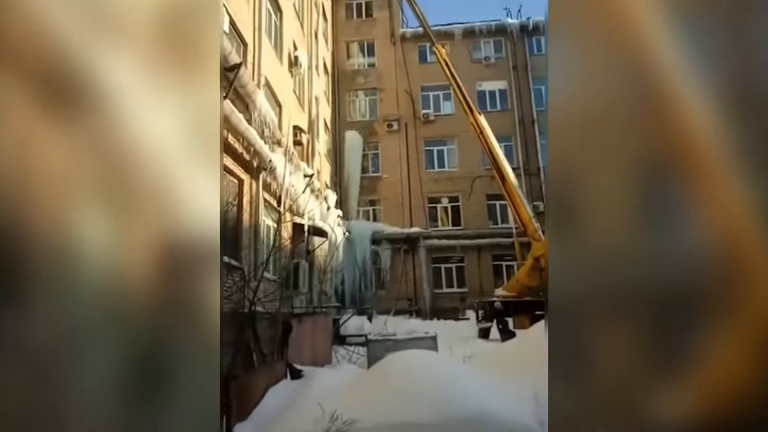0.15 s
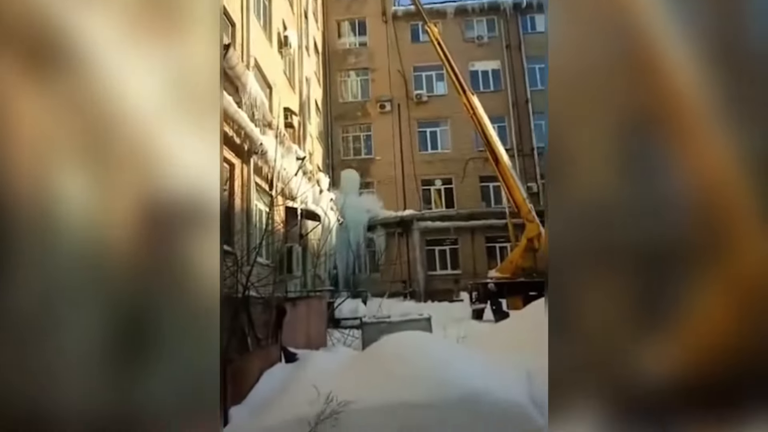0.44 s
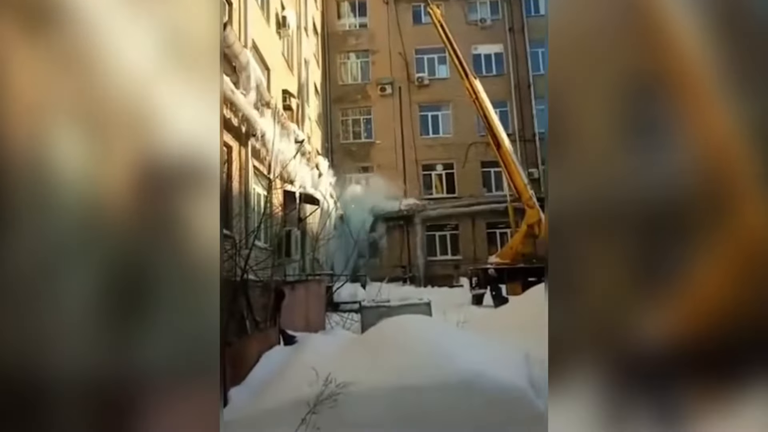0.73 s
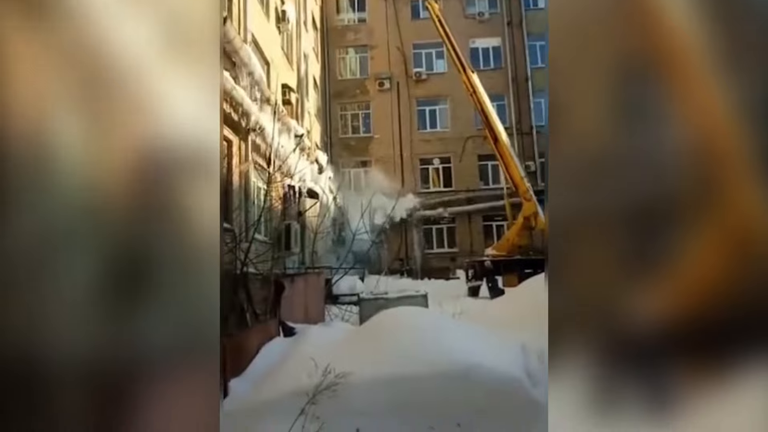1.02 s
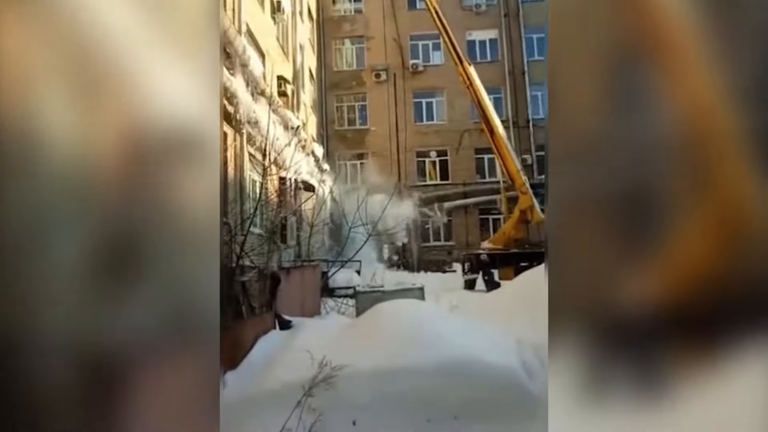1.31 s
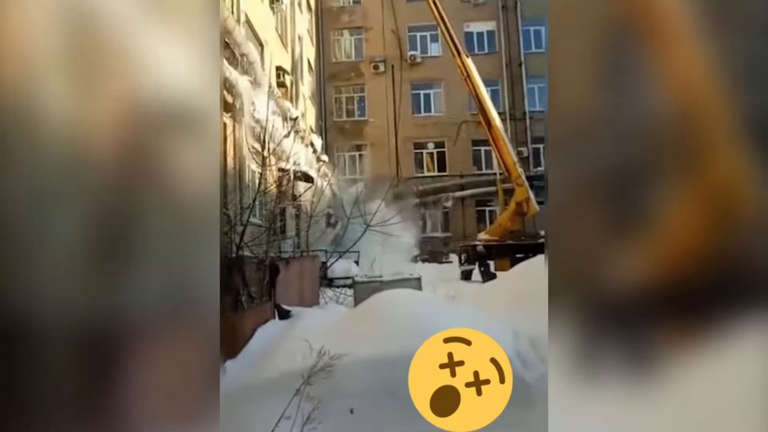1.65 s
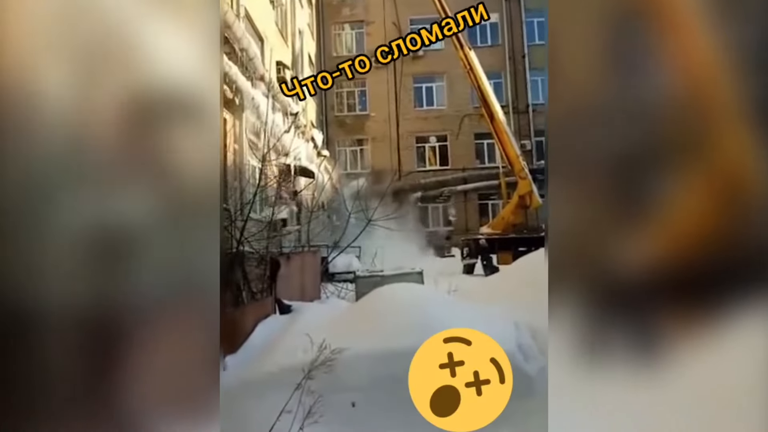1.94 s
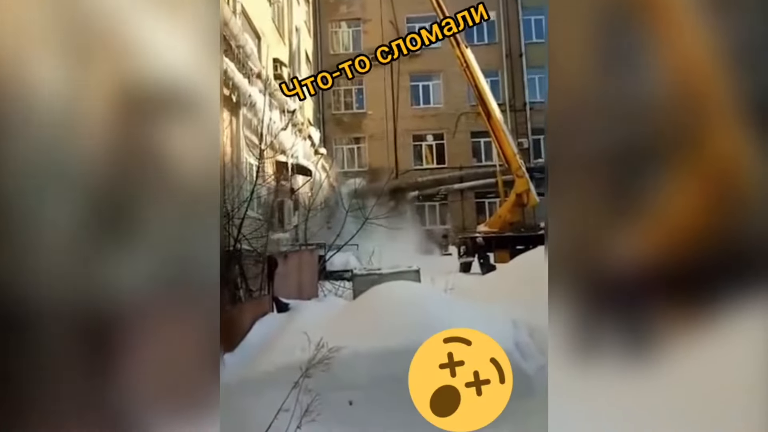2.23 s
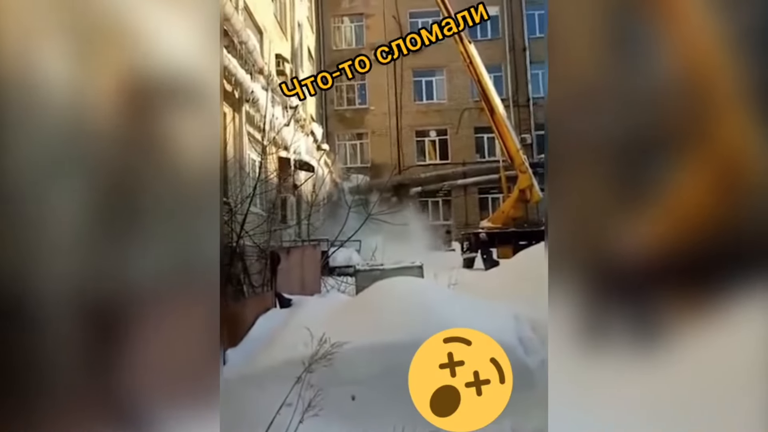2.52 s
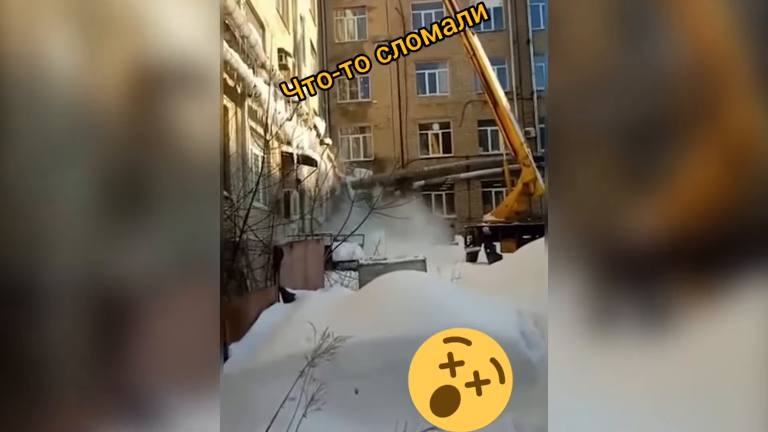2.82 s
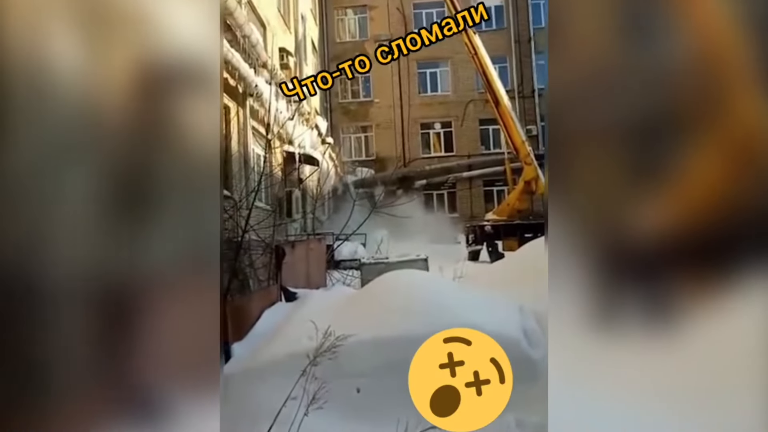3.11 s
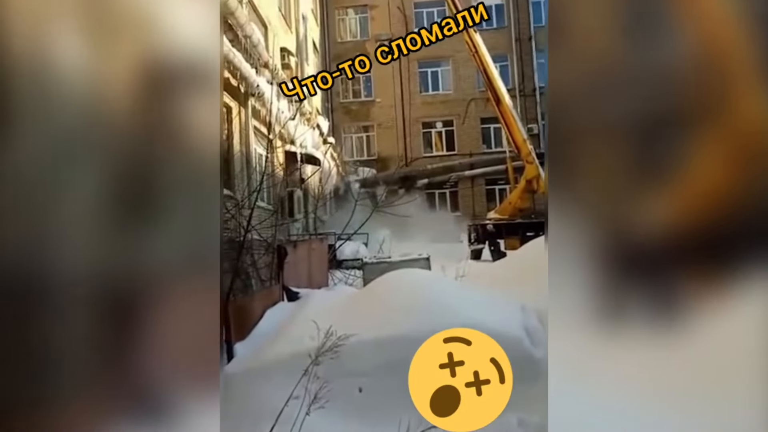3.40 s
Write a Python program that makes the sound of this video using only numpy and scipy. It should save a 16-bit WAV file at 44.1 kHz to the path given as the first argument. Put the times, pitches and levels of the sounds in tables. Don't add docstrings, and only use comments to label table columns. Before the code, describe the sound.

A huge ice mass crashes down almost at once, heavy slabs booming, blocks thudding, pieces cracking and shattering over pattering shards, then fading in an echoing courtyard, heard from afar through a phone microphone.

```python
import sys
import numpy as np
from scipy import signal
from scipy.fft import rfft, irfft
from scipy.io import wavfile
from scipy.ndimage import uniform_filter1d

SR = 44100
rng = np.random.default_rng(int(sys.argv[2]) if len(sys.argv) > 2 else 0)


def nominal_scale(level):
    x = np.asarray(level, float) / 20
    return 10 ** x


def wrap_up_sound(samples):
    columns = np.atleast_2d(samples).T
    tamed = np.clip(columns, -1, 1)
    steps = np.round(tamed * 32767).astype(np.int16)
    wavfile.write(sys.argv[1], SR, steps)


N = 156555


def rms_one(x):
    return x / np.sqrt(np.mean(x ** 2) + 1e-20)


def in_time(rows, lag=0.):
    s, db = np.transpose(rows)
    t = np.arange(N) / SR - lag
    return nominal_scale(np.interp(t, s, db)) * (t > s[0])


def colour(x, *tables):
    hz = np.log(np.maximum(np.arange(4097) * SR / 8192, 1))
    db = 0
    for table in tables:
        points = np.array(table)
        db = db + np.interp(hz, np.log(points[:, 0]), points[:, 1])
    cepstrum = irfft(np.log(nominal_scale(db)))
    cepstrum[1:4096] *= 2
    cepstrum[4097:] = 0
    response = irfft(np.exp(rfft(cepstrum)))
    return signal.fftconvolve(x, response)[:len(x)]


def drift(rate):
    r = np.exp(-80 * np.pi * rate / SR)
    slow = signal.lfilter([1], [1, -2 * r, r * r], rng.standard_normal(N // 40 + 2002))[2000:]
    return np.interp(np.arange(N) / 40, np.arange(len(slow)), rms_one(slow))


def knocks(rate, spread_db, clump_db, clump_rate):
    sizes = nominal_scale(spread_db * np.minimum(rng.exponential(1, N), 5)) * rng.choice([-1, 1], N)
    hits = rng.random(N) < rate / SR
    return rms_one(sizes * hits * nominal_scale(clump_db * drift(clump_rate)))


def yard(x, wet_db, t60_share):
    t60_s, delay_s, hop = 1, 0.031, 6000
    t = np.arange(SR) / SR
    decay = nominal_scale(-60 * t / (t60_s * t60_share)) * np.clip(t / delay_s - .5, 0, 1)
    decay *= nominal_scale(wet_db) / np.sqrt(np.sum(decay ** 2))
    fade = np.sin(np.pi * np.arange(2 * hop) / (2 * hop))
    padded = np.pad(x, (hop, 2 * hop))
    wet = np.zeros(N + 2 * SR)
    for i in range(0, N + hop, hop):
        piece = signal.fftconvolve(padded[i:i + 2 * hop] * fade, rng.standard_normal(SR) * decay)
        wet[i:i + len(piece)] += piece
    return (x + wet[hop:hop + N]) / np.sqrt(1 + nominal_scale(2 * wet_db))


# frequency in Hz, level in dB.
PORT_TONE = [(1050, 0), (1200, -5), (1500, 0), (1750, 3), (2000, -2.5), (2200, -6), (2800, -8.5),
             (3300, -5.5)]


def heard(contacts, spectrum, wet_db, t60_share):
    return rms_one(yard(colour(contacts, spectrum, PORT_TONE), wet_db, t60_share))


# frequency in Hz, level in dB.
IDLE_TONE = [(100, -2), (450, -15.5), (540, -14.5), (1080, -20.5), (1250, -30), (2100, -34.5), (2500, -39),
             (6000, -50.5)]


def idle():
    murmur = rms_one(colour(rng.standard_normal(N), IDLE_TONE, PORT_TONE))
    return nominal_scale(-36.5 + 0.39 * drift(25.0)) * murmur


# time in seconds, level in dB.
SHARD_FLOW = [(.06, -76), (.154, -68), (.164, -40), (.19, -41), (.2, -31.5), (.25, -32), (.36, -32.5),
              (.55, -34.5), (.92, -31), (1.45, -31), (1.7, -29), (2.0, -29), (2.2, -29.5), (2.4, -31),
              (2.55, -30), (2.9, -34.5), (3.22, -39), (3.55, -39)]
# frequency in Hz, level in dB.
SHARD_TONE = [(300, -14), (800, 1), (1500, -5), (3000, -0.5), (5000, -12.5), (7000, -6), (16000, -6)]


def shards():
    patter = heard(knocks(6000, 4.5, 0.95, 5.2), SHARD_TONE, 1.6, 0.9)
    return nominal_scale(7) * in_time(SHARD_FLOW) * patter


# start in seconds, peak level in dB, length in seconds, ring in Hz.
SHATTERS = [(0.163, -28, 0.011, 3880), (0.189, -24.5, 0.012, 3250), (0.242, -24.5, 0.032, 3240),
            (0.355, -23.5, 0.032, 3320), (0.79, -23.5, 0.035, 2640), (0.917, -34.5, 0.028, 3180),
            (1.092, -21, 0.04, 3200), (1.205, -21.5, 0.021, 3610), (1.282, -34, 0.021, 3190),
            (1.302, -29.5, 0.0085, 3300), (1.357, -21, 0.02, 3220), (1.415, -25.5, 0.019, 3380),
            (1.457, -21.5, 0.06, 3170), (1.503, -16.5, 0.013, 3560), (1.533, -18, 0.015, 3380),
            (1.739, -24, 0.015, 3700), (1.746, -14, 0.0059, 4340), (1.815, -20.5, 0.023, 3830),
            (1.9135, -9.5, 0.015, 3430), (1.966, -31, 0.008, 3400), (1.975, -15, 0.011, 3860),
            (2.028, -20, 0.096, 2650), (2.124, -18, 0.019, 3380), (2.232, -21.5, 0.013, 3400),
            (2.306, -11, 0.016, 3330), (2.323, -20, 0.012, 3500), (2.353, -16, 0.014, 3300),
            (2.378, -15.5, 0.013, 3860), (2.572, -17, 0.012, 3450), (2.599, -19, 0.019, 2510),
            (2.6444, -17.5, 0.017, 3650), (2.732, -21, 0.033, 3220), (2.762, -22.5, 0.017, 3440),
            (3.066, -23, 0.023, 3300), (3.238, -25.5, 0.021, 3280), (3.37, -27, 0.02, 3320),
            (3.51, -27.5, 0.016, 3360)]
# frequency in Hz, level in dB.
SHATTER_TONE = [(300, -27), (800, -12.5), (1700, 3), (3500, 1.5), (5000, -2.5), (8000, -5.5), (16000, -4)]


def bursts():
    level_db, attack_s, release_s = -8.5, .003, 0.024
    ring_db, ring_width_hz = 0, 400
    body = rms_one(colour(knocks(5000, 2.33, 0.44, 60.0), SHATTER_TONE, PORT_TONE))
    out = np.zeros(N + SR)
    u = np.arange(SR // 3) / SR
    r = np.exp(-np.pi * ring_width_hz / SR)
    for s, db, length, hz in SHATTERS:
        i = int(s * SR)
        gate = np.clip(u / attack_s, 0, 1) * np.exp(-np.clip(u - length, 0, 1) / release_s)
        piece = (nominal_scale(db + level_db) * gate)[:N - i] * body[i:i + len(u)]
        poles = [2, -4 * r * np.cos(2 * np.pi * hz / SR), 2 * r * r]
        ring = signal.lfilter([1 - r * r, 0, r * r - 1], poles, piece)
        out[i:i + len(piece)] += piece + nominal_scale(ring_db) * ring
    return yard(out[:N], -5.5, 0.17)


# start in seconds, peak level in dB.
CRACKS = [(1.041, -18.5), (1.284, -19), (1.495, -14), (1.56, -11.5), (1.597, -15.5), (1.737, -16),
          (1.781, -14), (2.332, -11), (2.391, -14.5), (2.485, -9.5), (2.683, -17.5), (2.835, -13.5),
          (3.049, -21), (3.08, -17), (3.252, -13.5), (3.433, -12.5), (3.514, -14.5)]
# frequency in Hz, level in dB.
CRACK_TONE = [(200, -21.5), (450, -2.5), (800, 4.5), (1100, -3), (1900, -3), (3000, -24.5)]


def crunches():
    level_db, attack_s, release_s = -8, 0.0037, 0.025
    t, gate = np.arange(N) / SR, np.zeros(N)
    for s, db in CRACKS:
        u = np.clip(t - s, 0, 1)
        gate += nominal_scale(db + level_db) * (1 - np.exp(-u / attack_s)) * np.exp(-u / release_s)
    contacts = rms_one(colour(knocks(1500, 1.9, 1.0, 40.0), CRACK_TONE, PORT_TONE))
    return yard(gate * contacts, -2.5, 0.67)


def landings(rows, level_db, length, attack_s, cycles, second_level, ratio, ratio_spread):
    out = np.zeros(N + SR)
    t = np.arange(length) / SR
    for (s, db, hz), (a, b) in zip(rows, rng.random((len(rows), 2))):
        shape = (1 - np.exp(-t / attack_s)) * nominal_scale(-60 * t * hz / (cycles * 2))
        second_hz = hz * (ratio + ratio_spread * a)
        ring = np.sin(2 * np.pi * hz * t) + second_level * np.sin(2 * np.pi * (second_hz * t + b))
        i = int(s * SR)
        out[i:i + length] += nominal_scale(db + level_db) * shape * ring
    return out[:N]


# start in seconds, peak level in dB, pitch in Hz.
BLOCK_LANDINGS = [(0.332, -10, 202), (0.381, -9.5, 337), (0.432, -5.5, 298), (0.527, -15, 292),
                  (0.634, -8.5, 400), (0.675, -15, 326), (0.709, 0, 237), (0.742, -8.5, 328),
                  (0.799, -10.5, 386), (0.829, -2.5, 310), (0.939, -4, 286), (0.974, -12, 279),
                  (1.008, -9, 242), (1.188, -5, 263), (1.279, -8, 350), (1.326, -6, 310), (1.375, -6, 318),
                  (1.549, -11, 253), (1.642, -4, 445), (1.712, -7, 274), (1.77, -4.5, 320),
                  (1.881, -7, 188), (2.045, -14.5, 219), (2.149, -11, 291), (2.391, -17.5, 287),
                  (2.452, -11, 477), (2.689, -13, 268), (3.048, -12, 315)]


def thuds():
    hits = landings(BLOCK_LANDINGS, level_db=0, length=SR // 4, attack_s=0.0034, cycles=6.5,
                    second_level=0.23, ratio=1.3, ratio_spread=0.25)
    return yard(hits, -9.0, 1.0)


# time in seconds, level in dB.
MASS_FLOW = [(.15, -50), (.19, -35), (.24, -17.5), (.44, -14.5), (.5, -15.5), (1.06, -17.5), (1.4, -16.5),
             (1.75, -18), (2.0, -18), (2.3, -21), (2.45, -17.5), (2.75, -22.5), (3.08, -22), (3.14, -26),
             (3.55, -31.5)]
# frequency in Hz, level in dB.
BOOM_TONE = [(20, -43.5), (40, -19), (80, -9), (120, -4.5), (180, -5.5), (300, -20), (600, -42)]
# frequency in Hz, level in dB.
BLOCK_TONE = [(120, -24), (200, -13.5), (280, 6.5), (400, 2.5), (550, -1), (900, -35.5)]
# frequency in Hz, level in dB.
CHUNK_TONE = [(60, -28.5), (150, -6.5), (250, -1.5), (350, -3.5), (600, -5), (1000, -13.5), (2000, -30),
              (5000, -40.5)]


def roar():
    t = np.arange(N) / SR
    boom = heard(knocks(690, 2.0, 0.45, 4.9), BOOM_TONE, 2.2, 0.88)
    blocks = heard(knocks(1300, 1.8, 0.27, 7.9), BLOCK_TONE, 2.9, 0.86)
    chunks = heard(knocks(2500, 3.26, 2.6, 11.9), CHUNK_TONE, 3.34, 0.79)
    sink = nominal_scale(-2 - 4.5 * t)
    swell = nominal_scale(-2.5) * np.exp(-((t - 1.04) / 0.37) ** 2 / 2)
    small = nominal_scale(-0.9) * chunks + swell * blocks
    return in_time(MASS_FLOW, 0.01) * sink * boom + in_time(MASS_FLOW) * small


# start in seconds, peak level in dB, pitch in Hz.
SLAB_LANDINGS = [(0.248, -11.5, 109.6), (0.314, -2, 117.7), (.34, -10, 87.3), (0.357, 0.5, 142.5),
                 (0.427, -5, 229), (0.529, -0.5, 169.4), (.614, -6, 130), (.706, -7.5, 166),
                 (0.78, -14, 130), (0.941, -2.5, 105), (0.972, -6.5, 118.5), (1.038, -0.5, 214),
                 (1.32, -10, 118.6), (1.48, -12.5, 109), (1.827, -11, 117), (2.201, -8, 155),
                 (2.478, -16.5, 152), (2.59, -18.5, 70.3), (3.085, -7.5, 225), (3.248, -14, 194)]


def slabs():
    hits = landings(SLAB_LANDINGS, level_db=6, length=SR // 2, attack_s=0.0061, cycles=3.82,
                    second_level=0.68, ratio=1.313, ratio_spread=.5)
    return yard(hits, -6.0, 0.38)


def scene():
    return (idle() + shards() + bursts() + crunches() + thuds() + roar() + slabs())[None]


# lower edge in Hz, level in dB, flicker in dB, share of holes from 0 to 1.
TREBLE_STEPS = [(5483, -2, 2.5, 0.4), (5730, -11.5, 3, 0.3), (6020, -9, 1, 0.31), (6500, -20.5, 0.5, .2),
                (7250, -31, 2, .05), (8030, -35.5, 0.8, 0), (9200, -34.5, 2, 0.08), (10900, -43.5, 6, 0.4),
                (11500, -53, 2.5, .6), (11970, -31, 1.5, 0.08), (13100, -24.5, -0.2, 0.08),
                (14230, -11.5, 0.5, 0), (15200, -26.5, -0.5, .15)]
# time in seconds, lift in dB.
UPPER_FLASHES = [(.255, 10), (1.37, 11.5), (1.433, 16.5), (1.51, 13), (1.755, 8.5), (1.925, 6), (2.33, 4),
                 (2.385, 5), (2.564, 12), (2.65, 11)]
# time in seconds, lift in dB, upper edge in Hz.
LOWER_FLASHES = [(1.435, 6, 11400), (1.752, 10, 11400), (1.92, 4, 11400), (2.385, -2, 11400),
                 (2.566, 10, 8800)]


def held(count, frames):
    return uniform_filter1d(rng.standard_normal((count, frames)), size=max(int(.13 * SR / 128), 1), axis=1)


def shelves(x):
    hole_db, mean_db = -25, -30
    hz, t, z = signal.stft(x, SR, nperseg=512, noverlap=384)
    strips, flicker = held(128, len(t)), held(len(TREBLE_STEPS), len(t))
    order = strips.argsort(axis=1).argsort(axis=1)
    rank = order[np.minimum(np.arange(len(hz)) // 2, 127)] / len(t)
    power = uniform_filter1d(np.sum(np.abs(z[30:64]) ** 2, axis=0), size=16)
    over = 10 * np.log10(power + 1e-12) - mean_db
    swing = 0.76 * np.maximum(over, -15)
    more_holes = np.clip(1 + 0.14 * -over * -1, .3, 2)
    db = np.zeros(z.shape)
    for (low_hz, level_db, flicker_db, holes), own in zip(TREBLE_STEPS, flicker):
        rows = hz >= low_hz
        dropped = rank[rows] < holes * more_holes
        db[rows] = level_db + flicker_db * rms_one(own) + swing + hole_db * dropped
    top = (hz >= 12900) & (hz < 14350)
    share = np.where(top, 1, 0.055 * (hz >= TREBLE_STEPS[0][0]))
    for s, lift_db in UPPER_FLASHES:
        db += lift_db * np.outer(share, np.abs(t - s) < .013)
    for s, lift_db, top_hz in LOWER_FLASHES:
        db += lift_db * np.outer((hz >= 7260) & (hz < top_hz), np.abs(t - s) < 0.011)
    db += hole_db * np.outer((hz >= 7340) & (hz < 9000), t < 0.36)
    db[hz > 15740] = -90
    return signal.istft(z * nominal_scale(db), SR, nperseg=512, noverlap=384)[1][..., :N]


def band_limit(x):
    return signal.sosfilt(signal.butter(12, 15750, fs=SR, output="sos"), x)


def record(dry):
    peak = 0.77
    bass_cut = signal.butter(2, 51, "high", fs=SR, output="sos")
    x = signal.sosfilt(bass_cut, dry[0])
    x = shelves(peak * np.tanh(x / peak))
    started = np.arange(N) > SHARD_FLOW[2][0] * SR
    hiss = nominal_scale(-82.5 - 12 * started) * rng.standard_normal(N)
    return band_limit((x + hiss)[None])


dry = scene()
out = record(dry)
wrap_up_sound(out)
```